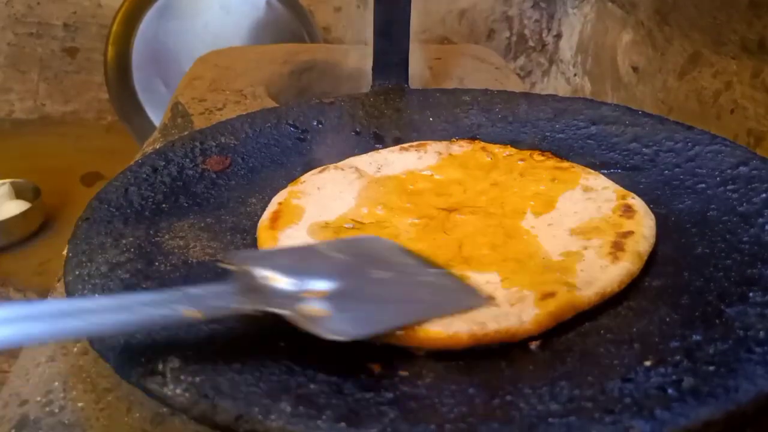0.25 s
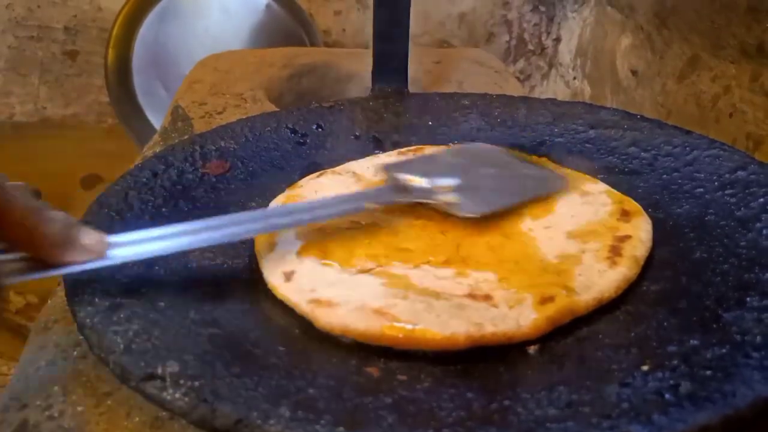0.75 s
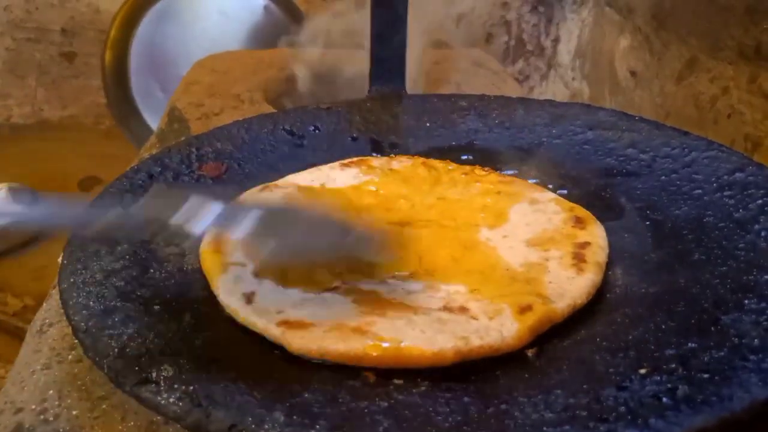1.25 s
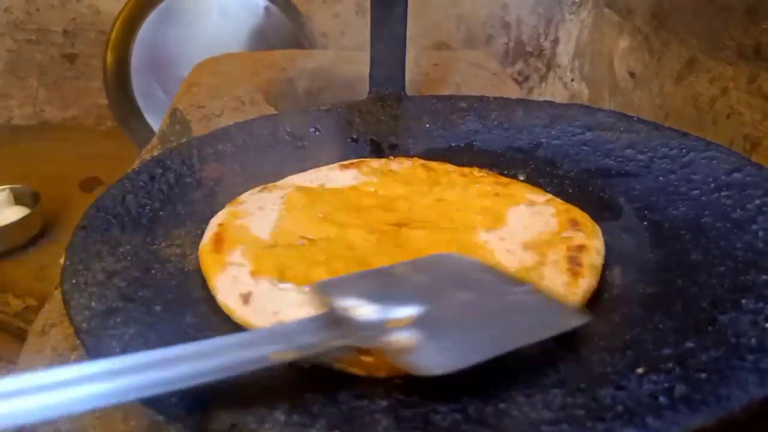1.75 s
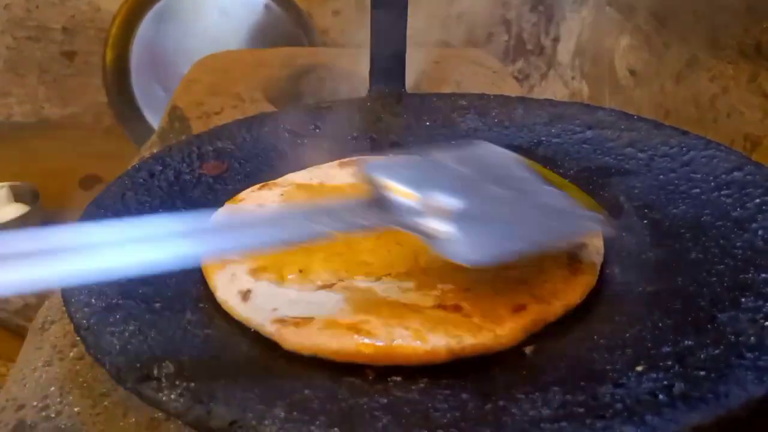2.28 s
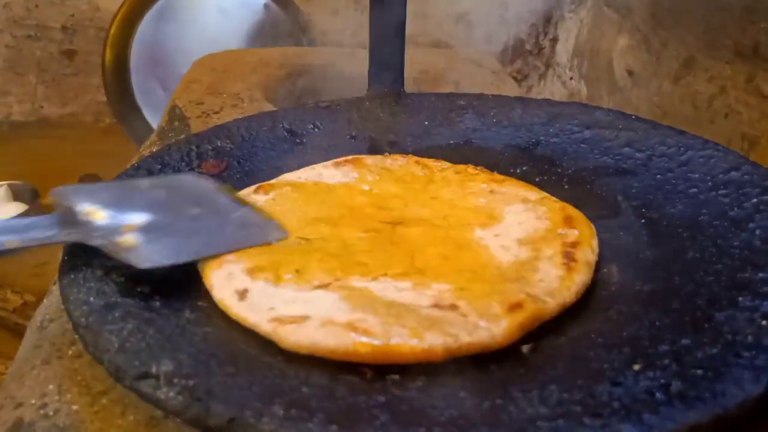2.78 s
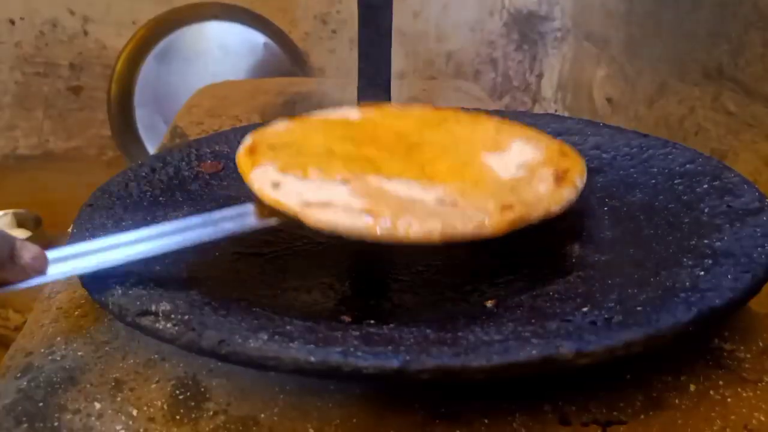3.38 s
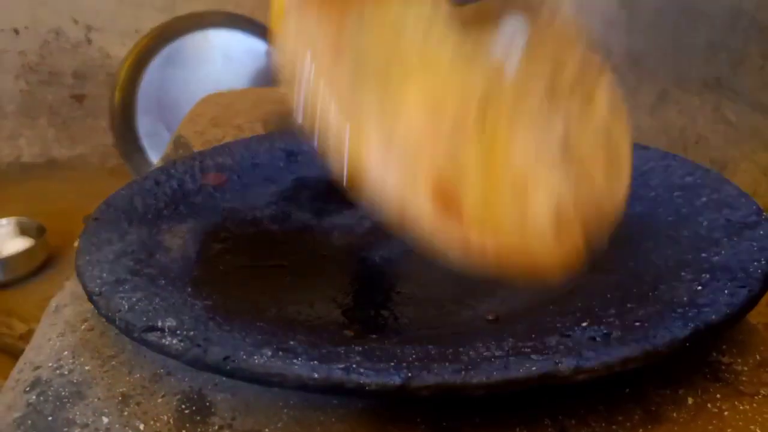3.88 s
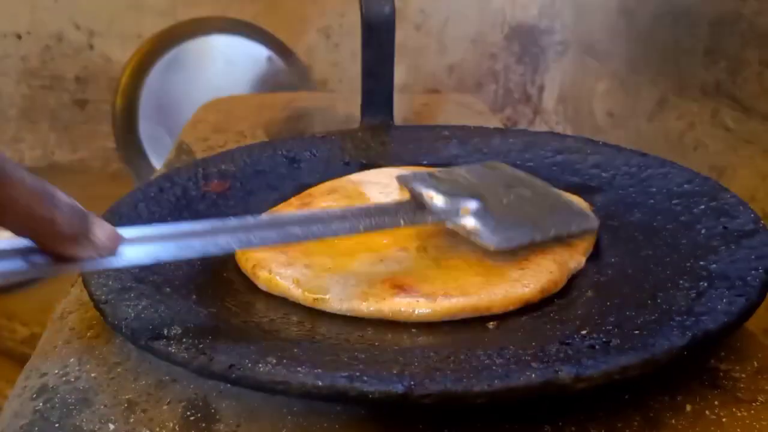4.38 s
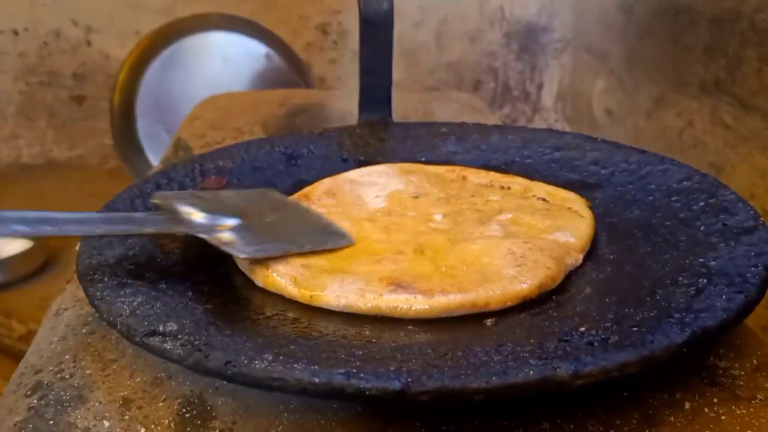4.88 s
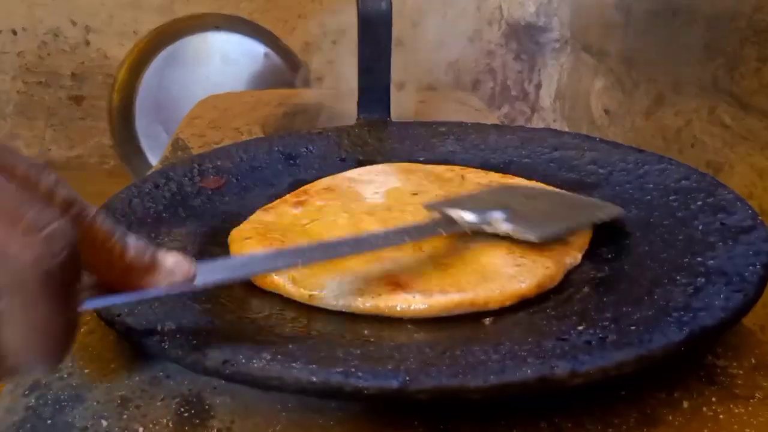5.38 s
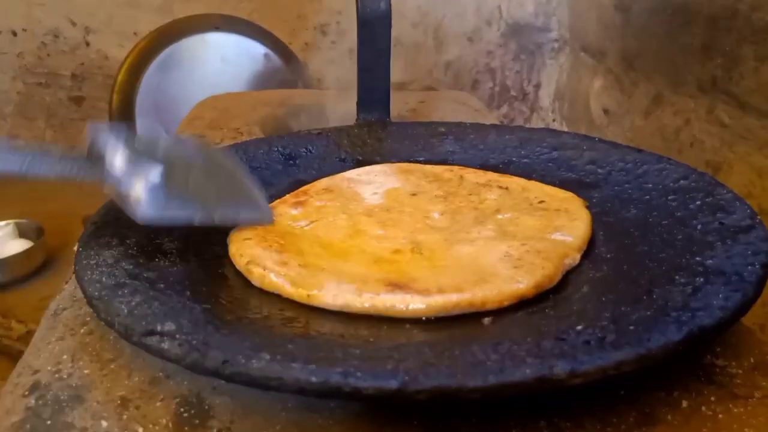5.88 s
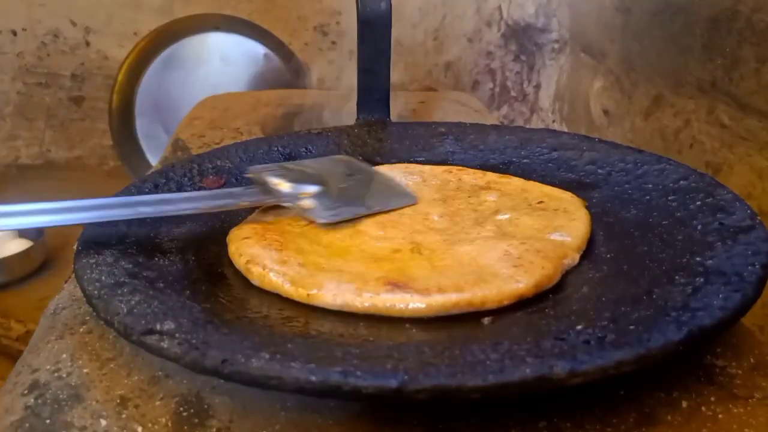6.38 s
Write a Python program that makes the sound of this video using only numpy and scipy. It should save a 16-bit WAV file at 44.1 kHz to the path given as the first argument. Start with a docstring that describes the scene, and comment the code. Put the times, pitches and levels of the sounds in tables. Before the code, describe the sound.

Flatbread sizzles in oil on a hot iron griddle, flaring with each spatula press, then flips with a loud slap and fries on more quietly.

```python
"""Flatbread on an oiled griddle

A flatbread fries in oil on an iron griddle, close to a mono microphone; a steel spatula presses and turns it.
Oil and steam are shaped noise bursts that swell at each press; whistles are narrow gliding bands of noise.
Drops spit as filtered puffs, and the crust scuffs as noise with a moving resonance. Halfway the blade flips the
bread; it lands with a slap, a crack over ringing partials, and the pressing goes on."""
import sys
import numpy as np
from scipy import signal
from scipy.fft import rfft, irfft
from scipy.io import wavfile
from scipy.ndimage import uniform_filter1d

SR = 44100
rng = np.random.default_rng(int(sys.argv[2]) if len(sys.argv) > 2 else 0)


def store_pcm(level_fs):
    """Save levels as 16-bit WAV."""
    pcm = np.round(np.clip(level_fs, -1, 1) * 32767).astype(np.int16)
    wavfile.write(sys.argv[1], SR, np.atleast_2d(pcm).T)


N = 292824
TIME = np.arange(N) / SR


def amp(db):
    """Decibels to gain."""
    return 10 ** (np.asarray(db) / 20)


def unit(x):
    """Scales to rms 1."""
    return x / np.sqrt(np.mean(x ** 2) + 1e-20)


def read(points, hz):
    """Reads a curve of (f/Hz, value) on a log-frequency axis."""
    f, value = np.transpose(points)
    return np.interp(np.log(hz + 1), np.log(f + 1), value)


def follow(rows, x):
    """Reads every further column of a curve table where its first column is x."""
    position, *columns = np.transpose(rows)
    return [np.interp(x, position, column) for column in columns]


def add(mix, s, sound):
    """Mixes a sound in at time s, in seconds."""
    part = mix[max(round(s * SR), 0):][:len(sound)]
    part += sound[:len(part)]


def shaped(x, field, size=512):
    """Filters x by a gain in dB, field(Hz, s), that moves with time."""
    overlap = size - size // 4
    hz, t, z = signal.stft(x, SR, nperseg=size, noverlap=overlap)
    z = z * amp(field(hz[:, None], t))
    return signal.istft(z, SR, nperseg=size, noverlap=overlap)[1][:len(x)]


def levelled(db, hz, band):
    """Offsets a colour so that white noise of rms 1 comes out at 0 dB inside the band."""
    inside = (hz >= band[0]) & (hz <= band[1])
    return db - 10 * np.log10(np.mean(amp(db) ** 2 * inside, axis=0))


def patches(hz, t, size):
    """Random blotches of rms 1, size = (bins, frames) across."""
    noise = rng.standard_normal((len(hz), len(t)))
    across_hz = uniform_filter1d(noise, size[0], 0)
    return unit(uniform_filter1d(across_hz, size[1], 1))


def bursts(per_s, spread_db, decay_s, wash):
    """Countless tiny bubbles burst, each a short puff, over a wash of those too small to tell apart."""
    sizes = amp(spread_db * np.minimum(rng.exponential(1, N), 5))
    sizes = sizes * (rng.random(N) < per_s / SR)
    power = signal.lfilter([1], [1, -np.exp(-2 / (decay_s * SR))], sizes ** 2)
    envelope = np.sqrt(power / power.mean() + wash ** 2)
    return unit(envelope * rng.standard_normal(N))


def puff(colour, tilt_db, decay_s, tail_db, tail_s, size=4096):
    """A sharp burst of noise with a short spray after it, coloured by a causal filter."""
    t, hz = np.arange(size) / SR, np.fft.rfftfreq(size, 1 / SR)
    envelope = np.exp(-t / decay_s) + amp(tail_db) * np.exp(-t / tail_s)
    burst = rng.choice([-1., 1.], size) * envelope
    log_gain = np.log(unit(amp(read(colour, hz) + tilt_db * np.log2(hz + 100))))
    # minimum phase: no sound ahead of the burst
    both_sides = np.r_[log_gain, log_gain[-2:0:-1]]
    response = np.exp(np.conj(signal.hilbert(both_sides)))[:len(hz)]
    return irfft(rfft(burst) * response) / 2


def ring(partials, hardness_hz, swing=1):
    """Dying partials of a struck body, peak 1; a soft contact favours the low ones."""
    t = np.arange(SR // 2) / SR
    sound = np.zeros(len(t))
    for k, (hz, db, t60) in enumerate(partials):
        # swing -1 starts neighbouring partials in opposite ways
        sound += swing ** k * amp(db - 60 * t / t60) * np.cos(2 * np.pi * hz * t)
    sound = signal.lfilter(*signal.butter(3, hardness_hz, fs=SR), sound)
    sound = signal.lfilter(*signal.butter(1, 110, "high", fs=SR), sound)
    return sound / abs(sound).max()


def gap(hz, t):
    """Peaks and notches, in dB, of the gap between blade, bread and iron; they change at the flip."""
    # resonances of the gap, one table per side of the bread: (f/Hz, width/Hz, level/dB)
    gap_before = [(1260, 74, -18), (1486, 420, 1.5), (1875, 110, 6.5), (2170, 78, -8), (2300, 270, 3.5),
                  (2770, 150, -3.5), (3030, 800, 3.5), (3500, 260, -6), (3650, 180, 1), (5200, 180, 1),
                  (6420, 630, 1.5), (6620, 230, -2), (7100, 120, 3.5), (7500, 170, 0), (8500, 370, 3.5),
                  (12500, 780, 4)]
    gap_after = [(1270, 133, -7.5), (1715, 96, 5), (1870, 150, -13.5), (2054, 170, 8), (2246, 110, -13),
                 (2601, 230, 9), (2970, 110, -3.5), (3170, 83, 4.5), (3580, 160, 7), (3830, 130, -9),
                 (3992, 140, 4.5), (4768, 127, 6.5), (6240, 220, 5), (6350, 160, -13.5), (7440, 120, 4.5),
                 (8010, 300, -0.5), (9300, 290, 2), (11900, 950, 3.5)]
    flip_s = 3.1

    def resonances(side):
        return sum(db / (1 + (2 * (hz - f) / width) ** 2) for f, width, db in side)
    return np.where(t < flip_s, resonances(gap_before), resonances(gap_after))


def boiling(t):
    """Oil, steam and fine spray in dB at times t: each press flares above the simmer, sags and dies away."""
    # the bread frying untouched, calmer once it is turned: (t/s, oil level/dB, steam level/dB)
    simmer = [(0, -38.5, -56.5), (.8, -37, -56.5), (1.8, -37.5, -53.5), (2.3, -35, -53), (2.55, -40, -51.5),
              (2.82, -39.5, -55.5), (3.0, -42.5, -72), (3.5, -42, -58), (3.6, -45, -78.5), (3.82, -49, -86),
              (4.7, -48, -80.5), (5.55, -46, -81.5), (6.25, -42.5, -81), (6.64, -39.5, -74)]
    # the bread is pressed onto the hot iron, levels ahead of the sag:
    # (start t/s, length/s, oil level/dB, steam level/dB)
    presses = [(0.247, 0.21, -32, -44.5), (0.45, 0.083, -30.5, -44.5), (0.55, 0.17, -36.5, -49),
               (0.92, 0.12, -35, -48), (1.06, 0.15, -36, -51), (1.192, 0.3, -32, -46),
               (1.564, 0.11, -37.5, -51), (1.956, .15, -28.5, -47), (2.105, .09, -36, -46),
               (2.409, 0.067, -37, -51), (2.568, 0.11, -32.5, -47.5), (2.678, 0.074, -39, -54.5),
               (3.179, 0.14, -38, -55.5), (3.883, .04, -60, -63.5), (3.968, 0.079, -34.5, -56.5),
               (4.081, 0.25, -41, -62.5), (4.275, .2, -41.5, -59), (4.734, 0.21, -38.5, -62),
               (4.938, 0.24, -37, -55.5), (5.178, 0.15, -36, -50.5), (5.616, 0.078, -45, -62),
               (5.673, 0.22, -34, -55), (5.89, 0.12, -38, -62), (5.996, .12, -38.5, -53),
               (6.396, 0.016, -45, -55), (6.458, 0.072, -35.5, -60), (6.558, .09, -41.5, -73)]
    # the boiling flares up, then eases as the water is used up
    attack_s, sag_db_per_s = .035, 14
    # dying away after the blade lifts
    oil_release_s, steam_release_s = 0.035, 0.029
    # fine spray at rest, and its change for each dB that a press adds to the oil
    spray_rest_db, spray_per_db = -0.95, -0.11

    rest_db, vapour_db = follow(simmer, t)
    oil, vapour = amp(rest_db) ** 2, amp(vapour_db) ** 2
    for start, length, oil_db, steam_db in presses:
        attack = np.clip((t - start) / attack_s, 0, 1)
        held = attack * amp(-sag_db_per_s * np.clip(t - start, 0, length))
        lifted = np.maximum(t - start - length, 0)
        oil = oil + (amp(oil_db) * held * np.exp(-lifted / oil_release_s)) ** 2
        vapour = vapour + (amp(steam_db) * held * np.exp(-lifted / steam_release_s)) ** 2
    level_db = 10 * np.log10(oil)
    spray_db = spray_rest_db + spray_per_db * (level_db - rest_db)
    return level_db, 10 * np.log10(vapour), spray_db


def surges(t):
    """Slight random unevenness of the boiling, in dB."""
    depth_db, spacing_s = 0.07, .04  # rms at the knots, and the time between them
    knots = rng.standard_normal(size=1024)
    return depth_db * np.interp(t / spacing_s, np.arange(len(knots)), knots)


def sizzle():
    """Water boils out of the oil: a bright crackle that swells each time the bread is pressed."""
    # relative colour of the boiling oil: (f/Hz, level/dB)
    oil_colour = [(1000, -52.5), (2900, -11), (3700, -11), (4600, -11.5), (5400, -6), (6100, 0), (7300, 0),
                  (8600, -2.5), (10000, -3), (11300, -7.5), (13500, -6), (15400, -6)]
    # more steam blows larger, lower bubbles: (steam level/dB, lower edge of the oil's band f/Hz)
    bubble_edge = [(-76.5, 4510), (-75.5, 3600), (-64, 3700)]

    def field(hz, t):
        level_db, steam_db, spray_db = boiling(t)
        edge_hz = follow(bubble_edge, steam_db)[0]
        below_edge_db = -48 * np.maximum(np.log2(edge_hz / (hz + 1)), 0)
        colour = read(oil_colour, hz) + gap(hz, t) + below_edge_db
        colour = levelled(colour, hz, (5000, 10500))
        fine = np.clip((hz - 8800) / 2800, 0, 1)  # share of the spray, growing towards the top
        pockets_db = 1.9 * patches(hz, t, size=(3, 14))
        return colour + level_db + surges(t) + fine * spray_db + pockets_db
    crackle = bursts(per_s=1000, spread_db=3.7, decay_s=.0005, wash=1.45)
    return shaped(crackle, field)


def steam():
    """Trapped steam sputters out at the rim, lower in pitch than the open oil."""
    # relative colour of the escaping steam: (f/Hz, level/dB)
    vapour_colour = [(200, -27.5), (900, -18.5), (1260, -30), (1430, -10), (1900, -3), (2400, -1.5),
                     (3100, 1), (4100, 3), (5200, 0), (7000, -7.5), (15000, -25)]
    resonance = 1.09  # steam leaves through the gap, so it is coloured more than the open oil

    def field(hz, t):
        colour = levelled(read(vapour_colour, hz) + resonance * gap(hz, t), hz, (1500, 3400))
        pockets_db = 4 * patches(hz, t, size=(4, 14))
        return colour + boiling(t)[1] + surges(t) + pockets_db
    sputter = bursts(per_s=1800, spread_db=4.5, decay_s=0.00077, wash=3.35)
    return shaped(sputter, field, size=1024)


def quiet_air():
    """Low background noise of the place, in slowly shifting blotches."""
    # relative colour of the air: (f/Hz, level/dB)
    air_colour = [(20, 0), (60, 2.5), (150, 5), (300, -6), (600, -10.5), (1200, -11.5), (3000, -28),
                  (15000, -24.5)]

    def field(hz, t):
        return read(air_colour, hz) + 4 * patches(hz, t, size=(4, 6))
    return amp(-74.5) * unit(shaped(rng.standard_normal(N), field, size=2048))


def whistles():
    """Narrow gliding resonances, excited by escaping steam or a slipping edge."""
    # thin whistles of steam and squeaks of the blade, level ahead of the fades:
    # (start t/s, end t/s, start f/Hz, end f/Hz, width of each resonator pole/Hz, level/dB)
    glides = [(.01, 0.125, 12700, 12650, 89, -45), (0.374, 0.412, 12500, 12500, 250, -29),
              (0.892, 0.92, 9550, 9500, 200, -34), (1.099, 1.759, 7840, 8390, 240, -39),
              (1.247, 1.699, 3900, 4160, 80, -46.5), (1.392, 2.602, 4210, 4215, 80, -50),
              (1.606, 2.596, 8220, 8600, 239, -47), (2.607, 2.959, 1170, 1245, 74.4, -59.5),
              (2.617, 2.918, 1796, 1585, 120, -56.5), (2.588, 2.845, 3740, 3640, 110, -50),
              (2.591, 2.8, 2550, 2560, 250, -49), (2.837, 3.092, 11250, 8900, 300, -55),
              (2.93, 3.168, 4800, 4190, 380, -53), (2.96, 3.09, 15400, 14400, 200, -52),
              (2.966, 3.251, 1094, 990, 68, -61), (3.096, 3.401, 4440, 4290, 380, -45.5),
              (3.129, 3.36, 9050, 8830, 450, -46), (3.65, 3.88, 3750, 3800, 220, -61),
              (4.411, 4.567, 1730, 1710, 130, -66)]
    out = np.zeros(N)
    for start, end, first_hz, last_hz, width_hz, db in glides:
        hz = np.linspace(first_hz, last_hz, int((end - start) * SR))
        r = np.exp(-np.pi * width_hz / SR)
        noise = rng.standard_normal((2 * SR, 2)) @ [1, 1j]
        flutter = signal.lfilter([1], np.poly([r, r]), noise)[-len(hz):]
        flutter = flutter / np.sqrt(abs(flutter))  # a sustained jet wavers more in pitch than in level
        tone = (flutter * np.exp(2j * np.pi * np.cumsum(hz) / SR)).real
        add(out, start, amp(db) * unit(tone) * signal.windows.tukey(len(hz), .7))
    return out


def pops():
    """Single drops spit: a few large ones, and small ones at random that grow with the boiling."""
    # large oil drops that burst: (t/s, puff level/dB, brightness/dB per octave)
    large = [(.2, -14, -1.5), (.526, -12.5, -6), (.5868, -8, 3), (.934, -7.5, 5.5), (2.589, -14.5, -1),
             (2.639, -12, 2.5), (2.663, -12.5, 1), (2.736, -16.5, 5), (3.156, -15, -5), (3.565, -22, 3),
             (3.898, -22.5, -2.5), (4.732, -21, 0.5), (4.778, -17, 9), (4.972, -14, 8), (4.983, -9, 15),
             (5.85, -10.5, 5), (5.876, -16, 1), (6.076, -10.5, 5.5), (6.226, -18, 5)]
    # relative colour of a spitting drop: (f/Hz, level/dB)
    spit_colour = [(300, -60.5), (1300, -58), (3000, -16), (5500, 1.5), (9500, 6.5), (13000, -3.5),
                   (15500, -0.5)]
    # small drops: how often, puff gain above the oil's level, rms spread of size
    drops_per_s, above_oil_db, spread_db = 6, 12, 1.5
    max_tilt_db = 4  # limit of their brightness, per octave

    out = np.zeros(N)
    size, tilt = rng.standard_normal(size=(2, 128))
    times = np.cumsum(rng.exponential(size=128)) / drops_per_s
    small_db = boiling(times)[0] + above_oil_db + spread_db * size
    small = np.transpose([times, small_db, max_tilt_db * np.tanh(tilt)])
    for s, db, tilt_db in [*large, *small[times < N / SR]]:
        add(out, s, amp(db) * puff(spit_colour, tilt_db, decay_s=.001, tail_db=-19, tail_s=.005))
    return out


def sliding():
    """The crust scuffs over the iron; the hollow under the bread gives a moving resonance."""
    # strokes that slide the bread, level ahead of the fades:
    # (start t/s, length/s, level/dB, hollow at the start f/Hz, at the end f/Hz, strength of the hollow/dB)
    strokes = [(0.279, 0.091, -53.5, 650, 624, 17), (0.386, 0.12, -48.5, 805, 640, 5),
               (0.41, 0.21, -61.5, 384, 330, 24), (0.996, 0.15, -63.5, 670, 665, 22),
               (1.234, 0.055, -57.5, 450, 447, 25), (1.291, .1, -53, 600, 570, 8),
               (1.438, 0.12, -67, 270, 290, 30), (1.61, 0.076, -65.5, 550, 557, 28),
               (1.959, 0.23, -52, 576, 634, 18.5), (2.118, .11, -52.5, 283, 250, 33),
               (2.576, 0.11, -51.5, 603, 398, -5), (3.25, 0.056, -61, 576, 593, 0),
               (4.002, 0.06, -61.5, 684, 683, 28), (4.318, 0.065, -68, 285, 280, 33),
               (4.429, 0.067, -61, 274, 270, 20), (4.835, 0.11, -61.5, 640, 675, 22.5),
               (5.188, 0.12, -49, 560, 670, 11), (5.213, 0.14, -68, 290, 260, 16),
               (5.28, 0.12, -52, 526, 620, 6), (5.746, 0.073, -64, 668, 660, 28),
               (6.061, 0.071, -66, 265, 250, 26)]
    # relative colour of the rubbing bread: (f/Hz, level/dB)
    dough_colour = [(60, -47), (170, -8.5), (270, -1), (370, 2), (490, -12.5), (660, 9), (830, -5),
                    (970, 10), (1080, -13), (1260, -10), (1600, 8), (3000, -26), (8000, -61)]
    fade_share = 0.58  # share of a stroke spent speeding up and slowing down

    out = np.zeros(N)
    grains = bursts(per_s=310, spread_db=3.5, decay_s=0.004, wash=1.0)
    for start, length, level_db, first_hz, last_hz, depth_db in strokes:
        def field(hz, t):
            centre_hz = np.interp(t, [0, length], [first_hz, last_hz])
            hollow_db = depth_db / (1 + ((hz - centre_hz) / 90) ** 2)
            blotches_db = 4 * patches(hz, t, size=(3, 7))
            return levelled(read(dough_colour, hz) + hollow_db + blotches_db, hz, (200, 1100))
        stretch = grains[int(start * SR):][:SR // 4]
        rub = unit(shaped(stretch, field, size=1024)[:int(length * SR)])
        add(out, start, amp(level_db) * rub * signal.windows.tukey(len(rub), fade_share))
    return out


def blows():
    """Bread or blade meets the griddle: a wet crack, ringing metal, then a damped thud; a pat only thuds."""
    # blade or bread strikes the griddle:
    # (t/s, thud peak level/dB, contact hardness as low-pass f/Hz, crack puff level/dB, metal peak level/dB)
    strikes = [(.901, -77, 1200, -33.5, -56), (1.874, -32, 454, -23.5, -60), (2.59, -59, 983, -25, -31.5),
               (2.612, -66, 900, -32, -40), (3.392, -43, 250, -65.5, -84.5), (3.432, -6, 942, -3, -18.5),
               (3.449, -7.5, 1197, -15.5, -19.5), (4.464, -54, 395, -74.5, -62),
               (6.41, -57, 111, -40.5, -74)]
    # soft pats, cushioned by the bread: (t/s, thud peak level/dB, contact hardness as low-pass f/Hz)
    pats = [(1.332, -49.5, 131), (1.883, -33, 138), (2.456, -52.5, 60), (4.123, -57.5, 130),
            (4.34, -61, 55), (5.876, -59, 60.3), (6.088, -54, 220)]
    # partials of the damped thud, then of the ringing metal: (f/Hz, relative level/dB, t60/s)
    thud_partials = [(110, -19, .15), (147, -4, .16), (211, 1.5, .125), (254, 0, .15), (333, -13, .07),
                     (375, -10, .07), (445, -20, .16), (555, -9, .085), (619, -20, .26), (670, -6, .05),
                     (810, -7, .045), (862, -9, .04), (923, -6, .045), (985, -9, .045)]
    metal_partials = [(1200, -7, .06), (1575, -7, .06), (1674, 4, .4), (2202, -6, .15), (2492, -7, .15),
                      (2638, -1, .09), (2810, -6, .07), (3433, 0, .095), (3505, -7, .1), (4161, -8, .11),
                      (4317, -7, .1), (4813, -9, .11), (5900, -2, .05), (7270, -2, .06)]
    # relative colour of the wet crack: (f/Hz, level/dB)
    crack_colour = [(60, -22.5), (250, -8), (900, -2), (1150, -8), (2000, -8), (2700, -5.5), (3700, -7.5),
                    (5200, -7.5), (5900, -1), (6300, -8), (7300, 1), (8300, -4), (11000, -8.5),
                    (15500, -15.5)]
    thud_lag_s = .0012

    out = np.zeros(N)
    for s, thud_db, hardness_hz, crack_db, metal_db in strikes:
        add(out, s + thud_lag_s, amp(thud_db) * ring(thud_partials, hardness_hz))
        crack = puff(crack_colour, 0, decay_s=0.0024, tail_db=-18.5, tail_s=.012)
        add(out, s, amp(crack_db) * crack)
        add(out, s, amp(metal_db) * ring(metal_partials, hardness_hz=8800, swing=-1))
    for s, thud_db, hardness_hz in pats:
        add(out, s, amp(thud_db) * ring(thud_partials, hardness_hz))
    return out


def room(x):
    """Short, faint scatter from the hearth and the wall behind it; outdoors the bass escapes."""
    # dying away of the scatter: (f/Hz, t60/s)
    scatter_t60 = [(100, 0.23), (1000, 0.11), (5000, 0.15), (15000, 0.045)]

    def field(hz, t):
        bass_loss_db = 12 / (1 + (hz / 500) ** 2)
        return -60 * t / read(scatter_t60, hz) - bass_loss_db
    length = SR // 3
    # sparse random echoes, none in the first 4 ms
    taps = rng.standard_normal(length) * (rng.random(length) < 2000 / SR) * (TIME[:length] > .004)
    tail = shaped(taps, field, size=256)
    return signal.fftconvolve(x, tail / np.linalg.norm(tail))[:N]


def scene():
    """All sounds of the griddle over quiet air, the same in both channels."""
    hits = pops() + blows()
    mono = sizzle() + steam() + quiet_air() + whistles() + sliding() + hits
    mono = mono + amp(-10.5) * room(hits)
    return np.array([mono, mono])


def record(dry):
    """The recorder's band limit: a steep low-pass."""
    low_pass = signal.firwin(511, 15650, window=("kaiser", 9), fs=SR)  # edge in Hz
    return signal.oaconvolve(dry, low_pass[None], "same")


dry = scene()
out = record(dry)
store_pcm(out)
```